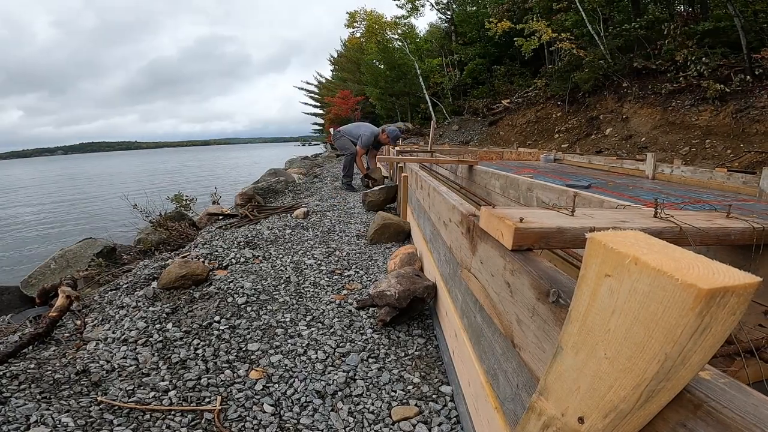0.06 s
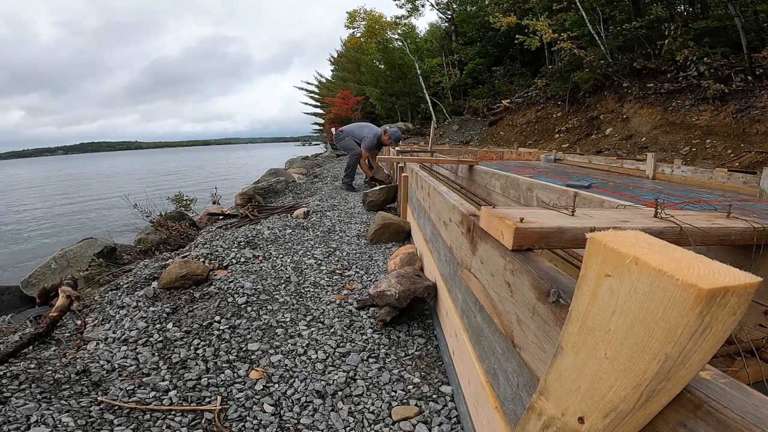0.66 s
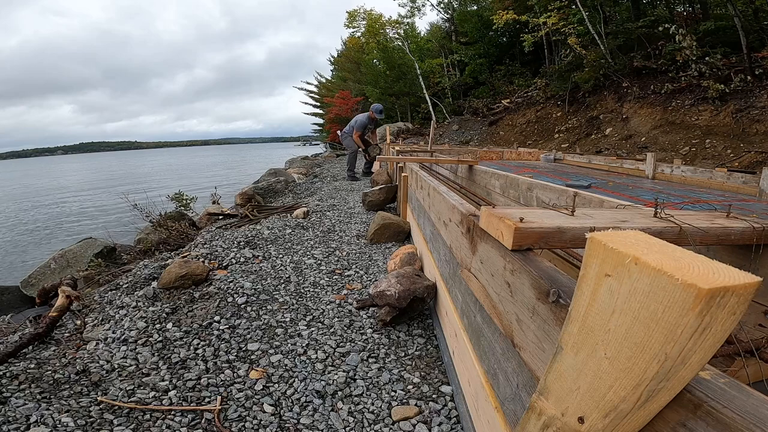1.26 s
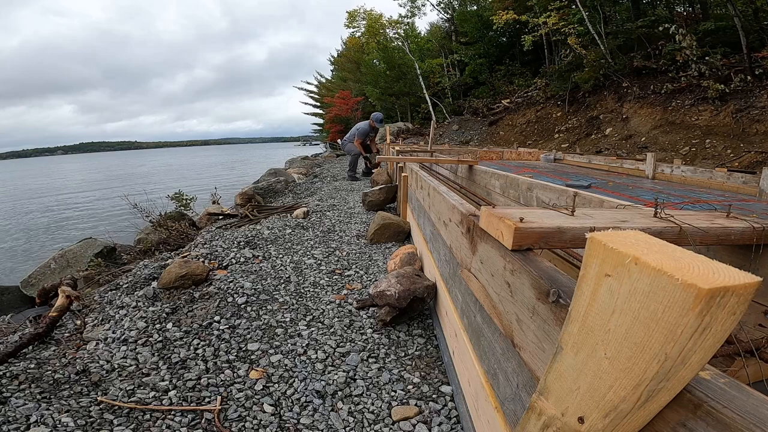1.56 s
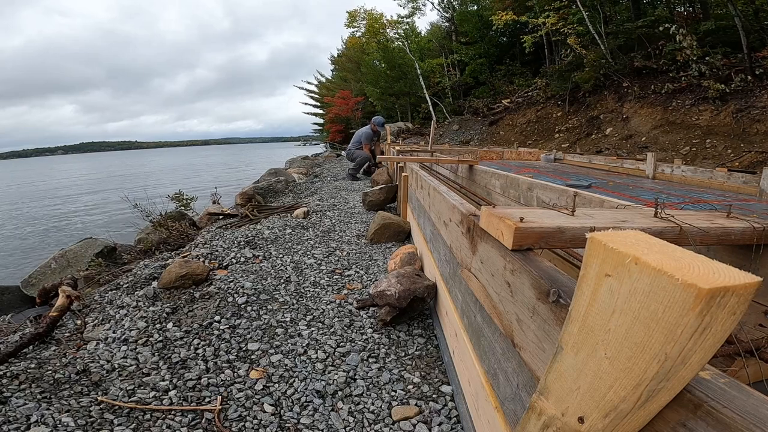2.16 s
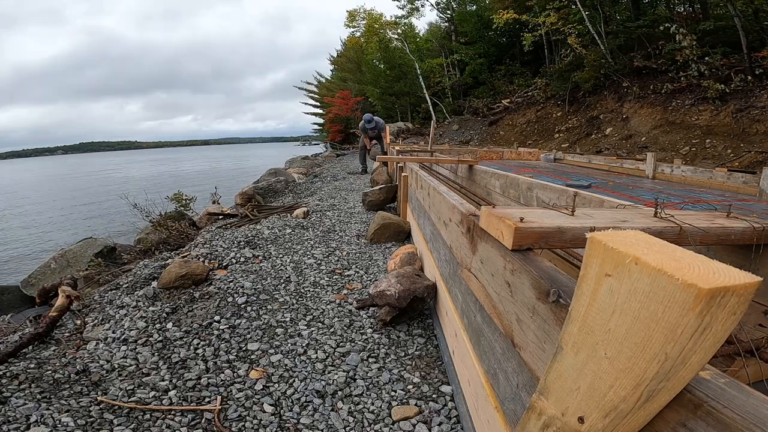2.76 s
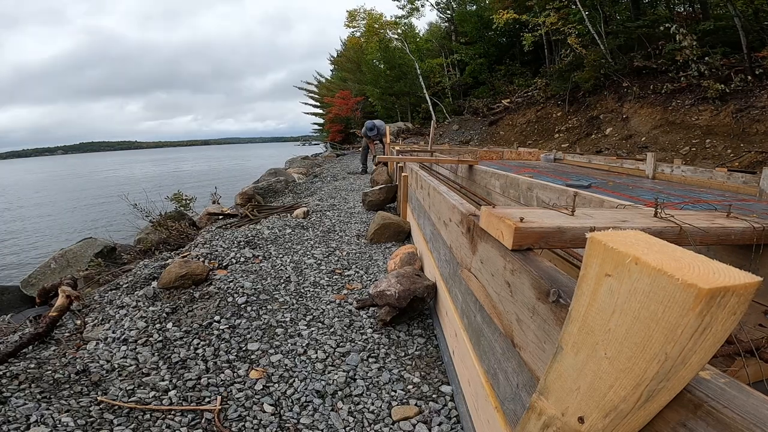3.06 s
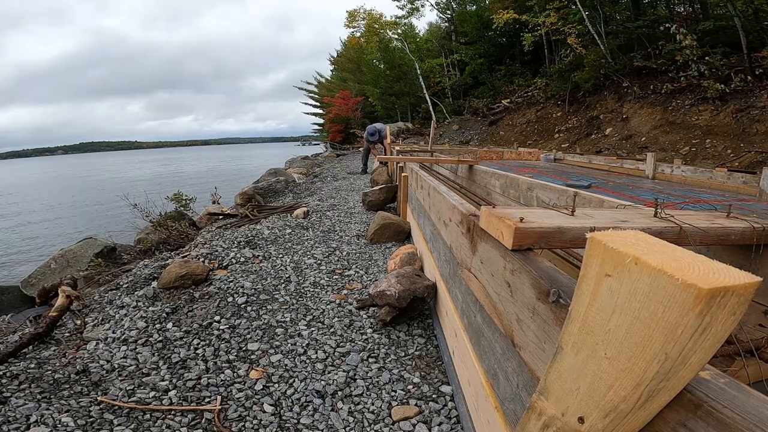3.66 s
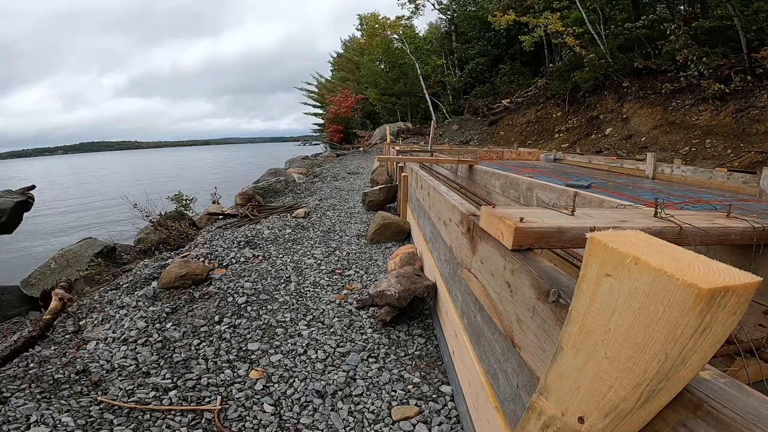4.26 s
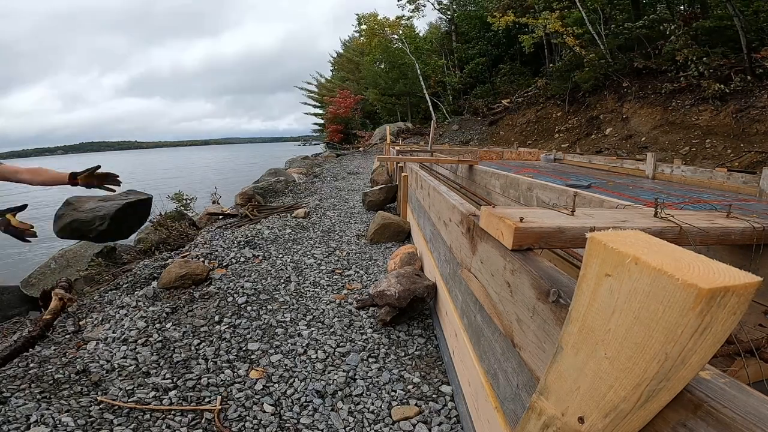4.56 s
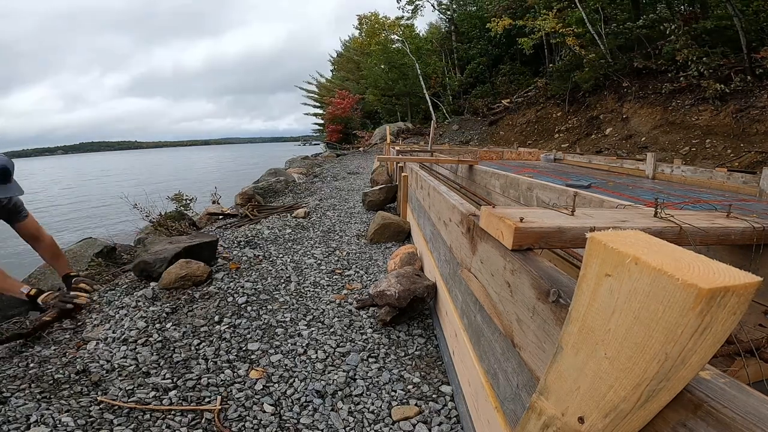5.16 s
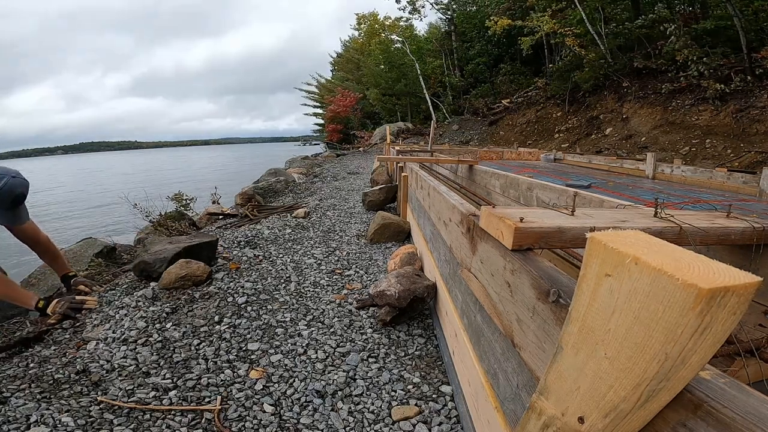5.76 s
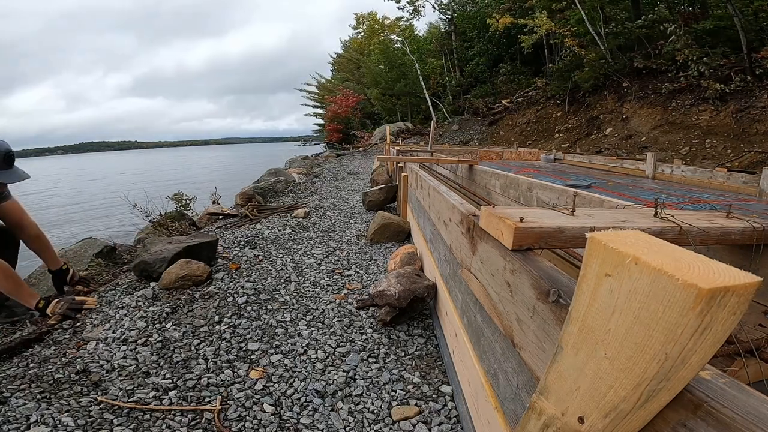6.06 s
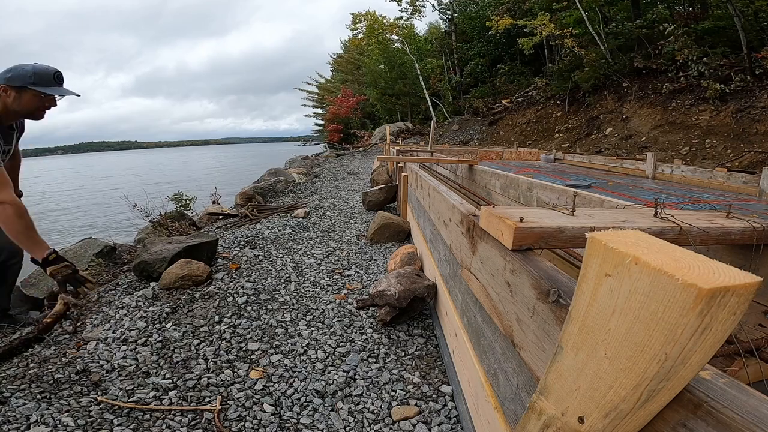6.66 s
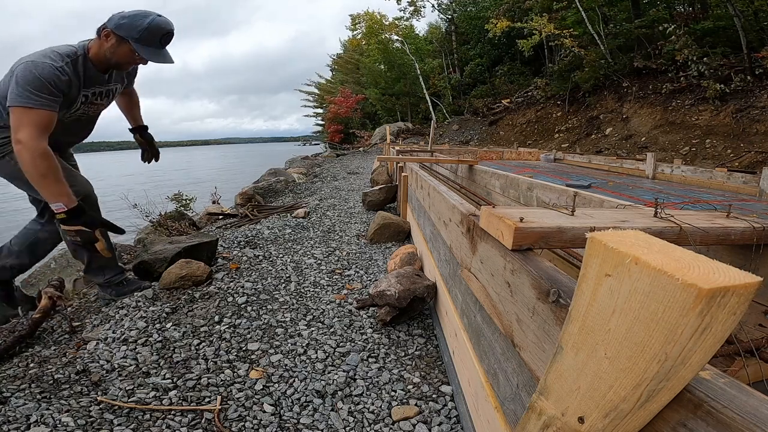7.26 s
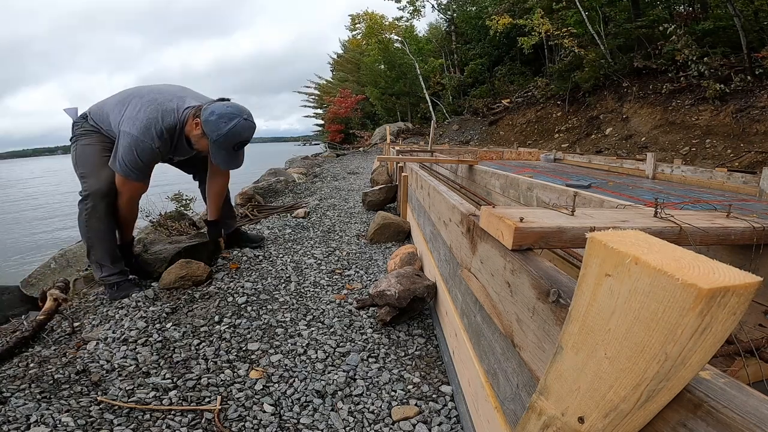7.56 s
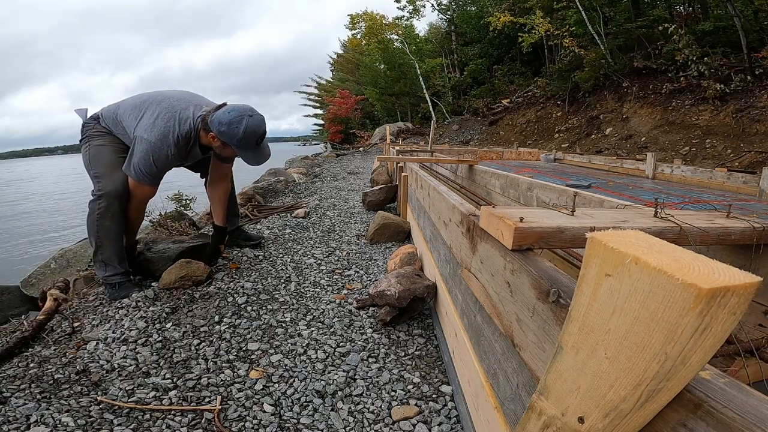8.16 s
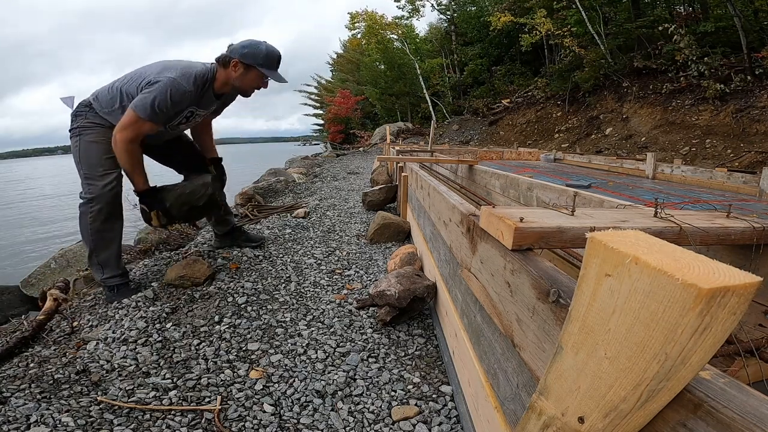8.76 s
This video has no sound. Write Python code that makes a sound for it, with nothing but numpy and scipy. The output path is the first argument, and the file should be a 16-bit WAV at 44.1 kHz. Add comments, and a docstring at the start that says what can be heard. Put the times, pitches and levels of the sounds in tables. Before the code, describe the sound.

Distant stones knock and thump against timber before a nearby rock crashes onto gravel, followed by boot crunches and faint ripples.

```python
"""On a gravel path beside a lake, rocks are shifted next to long timber formwork (boards for concrete).
Far rocks bump the boards, which ring and rumble. Then one is thrown down close by, pebbles spray,
a stone snaps against another, boots crunch and the rock is dragged up again. The gravel is countless
tiny collisions; single stones give short rings and cracks. Small waves hiss, gurgle and drip behind."""
import sys
import numpy as np
from scipy import signal
from scipy.fft import rfft, irfft
from scipy.io import wavfile
from scipy.ndimage import uniform_filter1d

SR = 44100
rng = np.random.default_rng(int(sys.argv[2]) if len(sys.argv) > 2 else 0)


def put_to_file(sound):
    """Save the sound as 16-bit audio at rate SR, in the file named by the first command-line argument."""
    columns = np.atleast_2d(sound).T  # one column per channel
    safe = np.clip(columns, -1, 1)
    whole_steps = np.round(safe * 32767)
    wavfile.write(sys.argv[1], SR, whole_steps.astype(np.int16))


N = 388962
TIME = np.arange(N) / SR
LULL_END_S = 3.745  # the background hiss jumps back up here
SILENT_DB = 60  # this far below its peak, a sound counts as gone

# In the tables, t60 is the time to fade by 60 dB, pan is left minus right,
# and tilt makes the sound above 400 Hz brighter (+) or duller (-).
# boots on gravel: (time [s], level [dB], rise [s], t60 [s])
STEPS = [(5.336, -42, 0.018, 0.18), (7.164, -47.5, 0.0056, 0.21), (7.213, -27.5, 0.018, 0.17),
         (7.38, -41.5, 0.0014, 0.25), (7.715, -48, 0.0089, 0.17), (7.799, -51, .012, 0.21),
         (7.98, -46.5, 0.0057, 0.24)]
# tone colour of shifting gravel: (frequency [Hz], level [dB])
SLIDE_COLOUR = [(90, -24), (194, 13), (280, 3.5), (460, 2.5), (600, -5), (800, -6), (970, 1), (1170, -4.5),
                (2540, -11), (3420, -7.5), (4000, -15.5), (4500, -12), (8600, -25.5), (12400, -37),
                (15000, -54)]


def amp(db):
    """Turn decibels into a gain."""
    return 10 ** (np.asarray(db) / 20)


def unit(x):
    """Scale to an average (rms) level of 1."""
    return x / np.sqrt(np.mean(x ** 2))


def decay(t, t60):
    """A fade that loses 60 dB every t60 seconds."""
    return np.exp(-np.log(1000) * t / t60)


def pan(db):
    """Left and right gains for a level difference."""
    return amp(np.array([[db], [-db]]) / 2)


def widen(mid, side, side_db):
    """Make left and right from a shared part (mid) and an opposed part (side)."""
    return mid + amp(side_db) * side * np.array([[1], [-1]])


def band(x, hz, width):
    """Keep one band of frequencies, at an average level of 1."""
    low = np.hypot(hz, width / 2) - width / 2
    bandpass = signal.butter(2, [low, low + width], "band", fs=SR, output="sos")
    return unit(signal.sosfilt(bandpass, x + 1e-18))


def add(out, s, sound):
    """Mix a sound in from time s on."""
    start = max(int(s * SR), 0)
    out[:, start:start + sound.shape[-1]] += sound[..., :N - start]


def read(points, hz):
    """Look up a table of (frequency [Hz], level [dB])."""
    known, db = np.transpose(points)
    return np.interp(np.log(hz), np.log(known), db)


def tint(colour, tilt, hz):
    """Gains for a tilted tone colour, with an average power of 1."""
    gain = amp(read(colour, hz) + tilt * np.log2(np.maximum(hz, 400)))
    return gain / np.sqrt(np.mean(gain ** 2, axis=-1, keepdims=True))


def shape_hiss(x, course, colour, flicker_db, size=512):
    """Colour a hiss, make it flicker and follow a course of (time [s], level [dB], tilt [dB/octave])."""
    hz, s, frames = signal.stft(x, SR, nperseg=size)
    times, levels, tilts = np.transpose(course)
    db, tilt = np.interp(s, times, levels)[:, None], np.interp(s, times, tilts)[:, None]
    flicker = uniform_filter1d(rng.standard_normal((len(s), len(hz))), size=7, axis=0)
    flicker = unit(uniform_filter1d(flicker, size=4, axis=1))  # nearby bands move together
    gain = amp(db + flicker_db * flicker) * tint(colour, tilt, np.maximum(hz, hz[1] / 2))
    return signal.istft(frames * gain.T, SR, nperseg=size)[1][:, :N]


def scatter(sound, paths):
    """The stones around send a sound back along many short paths."""
    return signal.fftconvolve(paths / np.linalg.norm(paths[0]), sound[None], axes=1)[:, :len(sound)]


def pings(table, modes, glide, attack_cycles, scatter_db, scatter_t60):
    """Short scattered rings; modes multiply each row's frequency, and glide bends it up or down."""
    out, t = np.zeros((2, N)), TIME[:SR // 5]
    for s, db, hz, t60 in table:
        pitch = hz * (1 + glide * np.minimum(t / t60, 1))
        phase = 2 * np.pi * np.cumsum(pitch) / SR
        ring = sum(amp(mode_db) * np.sin(ratio * phase) for ratio, mode_db in modes)
        attack = 1 - np.exp(-(t * hz / attack_cycles) ** 2)
        ring = ring * decay(t, t60) * attack
        ring = ring / np.abs(ring).max()
        paths = widen(*rng.standard_normal((2, len(t))), -17.0) * decay(t, scatter_t60)
        add(out, s, amp(db) * (ring + amp(scatter_db) * scatter(ring, paths)))
    return out


def lake(lull_start_s=2.465, edge_s=0.0048, sag_db=-50.5, lull_db=-57, lull_tilt=-3):
    """Ripples hiss along the shore. The background hiss sags, then drops suddenly into a duller lull and later
    jumps back up."""
    # the hiss before and after the lull: (time [s], level [dB], tilt [dB/octave])
    hiss_levels = [
        [(0.0, -45.5, -1.5), (0.58, -45.5, -1.5), (1.2, -49.5, -1), (2.05, -48.5, -1)],
        [(3.76, -50, -1), (5.05, -44.5, -2), (5.3, -48, -1.5), (7.7, -48, -0.5), (8.15, -50.5, -1.5)],
    ]
    # tone colour of the ripples: (frequency [Hz], level [dB])
    colour = [(18, -30), (30, 4.5), (87, -19.5), (113, -25), (147, 5.5), (185, -12.5), (296, -11.5),
              (374, -6.5), (415, -2), (448, -25), (552, -11), (790, -14), (1050, -7.5), (1400, -7.5),
              (2100, -7), (3200, -5.5), (5600, -12), (8690, -22.5), (15000, -40)]
    # their stereo width: (frequency [Hz], side minus mid [dB])
    width = [(60, -13.5), (400, -15.5), (1300, -20.5), (2400, -24), (4400, -8.5), (8000, -2.5)]
    mid, side = rng.standard_normal((2, N))
    padded = 10 * SR
    hz = np.fft.rfftfreq(padded, 1 / SR) + 1
    side = irfft(rfft(side, padded) * amp(read(width, hz)))[:N]
    before, after = hiss_levels
    lull = [(lull_start_s - edge_s, sag_db, 0), (lull_start_s, lull_db, lull_tilt),
            (LULL_END_S, lull_db, lull_tilt)]
    return shape_hiss(widen(mid, side, 0), [*before, *lull, *after], colour, flicker_db=1.69)


def gurgles(throb_db=4):
    """Water washes into a hollow of the shore and makes it resound unevenly."""
    # small waves: (middle time [s], level [dB], half length [s], frequency [Hz], band width [Hz])
    wavelets = [(0.86, -52.5, 0.27, 940, 230), (0.83, -49, 0.11, 430, 145)]
    out, t = np.zeros((2, N)), TIME[:SR]
    for s, db, half_length, hz, width in wavelets:
        throb = np.interp(t, np.linspace(0, 1, 35), rng.standard_normal(35))
        swell = np.exp(-((t - .5) / half_length) ** 2)
        hollow = band(rng.standard_normal(SR), hz, width)
        add(out, s - .5, amp(db + throb_db * throb) * swell * hollow)
    return out


def drips():
    """Drops fall among the shore rocks, each a tiny ring that rises in pitch."""
    # drops: (time [s], level [dB], base frequency [Hz], t60 [s])
    drops = [(1.4028, -49, 1310, 0.02), (3.2965, -44.5, 1000, 0.0067), (6.228, -42, 989, .012),
             (6.5366, -33, 1340, 0.0042), (6.992, -39, 1090, 0.0066), (7.06, -40, 1080, 0.0087)]
    return pings(drops, [(0.97, 0)], glide=0.096, attack_cycles=0.49, scatter_db=6.5, scatter_t60=0.044)


def falling_tones():
    """Two short, soft, low tones that fall in pitch."""
    # tones: (time [s], level [dB], base frequency [Hz], t60 [s])
    tones = [(4.568, -32.5, 270, 0.097), (6.22, -47, 337, 0.074)]
    return pings(tones, [(0.86, 0)], glide=-0.87, attack_cycles=4.2, scatter_db=-36, scatter_t60=0.18)


def pebbles(rate, spread_db):
    """Countless collisions from all sides: each pebble size ticks in its own band, small ones more often."""
    # stereo width of the ticks: (frequency [Hz], side minus mid [dB])
    width = [(200, -31), (1000, -24.5), (8000, -10), (12000, -0.5)]
    out = 0
    for hz in 100 * 2 ** (np.arange(15) / 2):  # half an octave apart
        count = int(rate * np.sqrt(hz / 1000) * N / SR)
        when, chance, place = np.random.default_rng(rng.integers(1 << 30)).random((count, 3)).T
        strength = amp(-spread_db * np.log(chance * .99 + .01)) * np.sign(place - .5)
        samples = (when * N).astype(int)
        mid = np.bincount(samples, strength, N)
        side = np.bincount(samples, strength * np.sqrt(2) * np.cos(4 * np.pi * place), N)
        ticks = widen(mid, side, read(width, hz))
        out = out + np.sqrt(hz) * band(ticks, hz, hz * (np.sqrt(2) - 1))
    return unit(out)


def slides(grains):
    """Dragged gravel swells to a peak and runs out, catching and giving way as it goes."""
    # scuffs and drags: (peak time [s], level [dB], swell [dB/s], fade [dB/s], tilt [dB/octave])
    drags = [(.8, -57, 500, 200, 13), (1.12, -51, 297, 211, 3), (6.3, -55, 17, 12, -0.5),
             (6.7, -59, 90, 73, 7), (7.4, -55, 148, 29, 5), (7.799, -52, 36.5, 68, 1),
             (8.4, -47.5, 63, 53, 3.5), (8.536, -42.5, 128, 230, 2.5), (8.624, -40, 210, 283, 3.5),
             (8.675, -41.5, 380, 153, 2.5), (8.775, -49, 136, 120, 5.5)]
    out = 0
    for s, db, swell, fade, tilt in drags:
        start, end = s - SILENT_DB / swell, s + SILENT_DB / fade
        course = [(start, db - SILENT_DB, tilt), (s, db, tilt), (end, db - SILENT_DB, tilt)]
        out = out + shape_hiss(grains, course, SLIDE_COLOUR, flicker_db=3)
    return out


def spray(grains, start_s=4.81, rise_s=0.026, hold_s=0.25):
    """Pebbles thrown up by the big rock rain down, while the bed beneath it grumbles."""
    # the bright pebbles and the dark bed, each: (level [dB], fade [dB/s], tilt [dB/octave])
    shower = (-48, 57, 1)
    grumble = (-53.5, 36, -4.5)
    # tone colour of the falling pebbles: (frequency [Hz], level [dB])
    shower_colour = [(1470, -35), (2500, -9), (2650, -4), (3500, -6), (8550, -4.5), (12400, -15.5),
                     (15000, -23)]
    out, full = 0, start_s + rise_s
    spent = full + hold_s
    for (db, fade, tilt), colour in ((shower, shower_colour), (grumble, SLIDE_COLOUR)):
        course = [(start_s, db - SILENT_DB, tilt), (full, db, tilt), (spent, db, tilt),
                  (spent + SILENT_DB / fade, db - SILENT_DB, tilt)]
        out = out + shape_hiss(grains, course, colour, flicker_db=1.8)
    return out


def grinds(grains, rise_s=0.0063, t60=0.049, width_share=0.47, slips_per_s=149, uneven_db=-1.5):
    """Grit catches and slips between two stones, sounding one broad band while the weight presses."""
    # stones grinding: (time [s], length [s], level [dB], main frequency [Hz])
    rubs = [(0.797, 0.024, -41.5, 960), (2.083, 0.013, -34, 1610), (2.733, 0.049, -50, 1130),
            (2.816, .04, -56, 1120), (3.591, 0.014, -43, 1270), (3.628, .04, -51.5, 735),
            (3.713, 0.0098, -41.5, 1150), (4.816, 0.02, -39, 1430), (4.817, 0.017, -29.5, 2670),
            (7.215, 0.018, -32, 454), (7.216, 0.027, -30, 910), (7.23, .025, -37, 4360),
            (8.587, .05, -52, 990), (8.666, 0.016, -54, 980)]
    out, t = np.zeros((2, N)), TIME[:SR // 4]
    for (s, length, db, hz), slips in zip(rubs, rng.standard_normal((len(rubs), 64))):
        grit = np.roll(grains, -int(s * SR), axis=1)[:, :len(t)]
        load = np.minimum(t / rise_s, 1) * decay(np.maximum(t - length, 0), t60)
        judder = np.interp(t * slips_per_s, np.arange(len(slips)), slips)
        add(out, s, amp(db + uneven_db * judder) * load * band(grit, hz, hz * width_share))
    return out


def contacts():
    """List the boots, stone edges and landing rocks that press into the gravel."""
    # a stone's hard edge bites: (time [s], level [dB], t60 [s], tilt [dB/octave], pan [dB])
    bites = [(3.629, -40, 0.3, -8.5, -2), (3.656, -42.5, 0.075, -9, 0), (4.805, -25.5, 0.084, 1, 11),
             (6.405, -31, 0.029, -4, 3), (6.42, -25, 0.021, 0.5, 8)]
    # a rock lands and settles: (time [s], level [dB], settling level [dB], tilt [dB/octave], pan [dB])
    landings = [(2.079, -32, -36.5, -4, -1.5), (2.73, -47, -49.5, -3.5, 0), (3.485, -36.5, -52, -3.5, 0),
                (3.581, -30.5, -50, -13, -1), (4.811, -21, -38.5, -0.5, -2)]
    step_tilt, step_pan_db = -4, 1
    bite_rise_s, land_rise_s, land_t60 = 0.0026, 0.011, 0.081
    settle_after_s, settle_rise_s, settle_t60, settle_tilt = 0.014, 0.0086, 0.47, -4.5
    rows = [(s, db, rise, t60, step_tilt, step_pan_db) for s, db, rise, t60 in STEPS]
    rows += [(s, db, bite_rise_s, t60, tilt, pan_db) for s, db, t60, tilt, pan_db in bites]
    for s, db, settle_db, tilt, pan_db in landings:
        rows.append((s, db, land_rise_s, land_t60, tilt, pan_db))
        rows.append((s + settle_after_s, settle_db, settle_rise_s, settle_t60, tilt + settle_tilt, pan_db))
    return rows


def crunches(grains, bass_hz=1500, bass_linger=1.3):
    """A weight sinks into the gravel: collisions flare up and die away, the big slow stones last."""
    # tone colour of a crunch: (frequency [Hz], level [dB])
    colour = [(220, -22), (380, -4.5), (622, -9.5), (795, -2.5), (1190, -5.5), (1430, -1.5), (2000, 0),
              (2810, 1), (3370, 0.5), (8230, 1.5), (15000, -17)]
    out = np.zeros((2, N))
    for s, db, rise, t60, tilt, pan_db in contacts():
        burst = grains[:, int(s * SR):][:, :SR // 2]
        t = TIME[:burst.shape[1]]
        hz = np.fft.rfftfreq(len(t), 1 / SR) + 1
        spectrum = rfft(burst) * tint(colour, tilt, hz)
        big_stones = 1 / (1 + (hz / bass_hz) ** 2)
        for share, life in ((big_stones, t60 * bass_linger), (1 - big_stones, t60)):
            shape = np.minimum(t / rise, 1) * decay(np.maximum(t - rise, 0), life)
            add(out, s, amp(db) * pan(pan_db) * shape * irfft(spectrum * share, len(t)))
    return out


def heels(heel_db=-1, low_hz=101, high_hz=500):
    """Each step sends one dull blow through the ground to the boards."""
    return [(s, db + heel_db, low_hz, high_hz, TIME[-1], 0) for s, db, _, _ in STEPS]


def thuds(gap_s=.04, gap_spread=0.1218):
    """Runs of ever duller low thuds; the late runs are soft, deep puffs of rumble."""
    # runs: (time [s], level [dB], length [s], fade [dB/s], highest frequency [Hz], pan [dB])
    runs = [(0.033, -24, 0.064, 54.5, 82, 9), (0.101, -18, 0.054, 60, 140, 5),
            (0.162, -17.5, 0.26, 70, 182, 4.5), (0.477, -33.5, 0.099, 88, 100, 5),
            (0.605, -15.5, 0.12, 118, 233, -2.5), (2.104, -10, 0.21, 136, 410, -3.5),
            (2.15, -14.5, 0.17, 123, 114, -5.5), (2.306, -32, .155, 22.5, 190, -2.5),
            (2.724, -37.5, 0.14, 50, 181, 1), (2.771, -37, 0.056, 202, 170, 1),
            (3.505, -29, 0.019, 450, 230, 0.5), (3.589, -9, .155, 60, 330, -4),
            (3.654, -21, .05, 200, 620, -4), (4.822, -17.5, 0.028, 240, 190, 0),
            (4.853, -29.5, 0.093, 60, 161, -4), (6.242, -30.5, 0.13, 202, 52.7, -10),
            (6.401, -38.5, .06, 150, 90.8, 0), (7.639, -47, 0.071, 60, 69, -7),
            (7.782, -43, 0.11, 110, 100, -8), (8.08, -45.5, 0.18, -8, 64.5, -2)]
    dull_share, dull_s = 0.4, 0.095  # the top frequency sinks towards this share
    bass_hz, thin_share, thin_s = 22.6, 0.21, 0.12  # the first thuds of a run have less bass
    rows = []
    for (s, db, length, fade, hz, pan_db), chance in zip(runs, rng.standard_normal((len(runs), 16))):
        gaps = gap_s * np.exp(gap_spread * chance)
        ages = np.cumsum(gaps) - gaps
        for age in ages[ages < length]:
            high_hz = hz * (dull_share + (1 - dull_share) * np.exp(-age / dull_s))
            low_hz = min(bass_hz + thin_share * hz * np.exp(-age / thin_s), high_hz / 2)
            rows.append((s + age, db - fade * age, low_hz, high_hz, s + length, pan_db))
    return rows


def timber(t, twist=0.31, uneven_db=2, detune=.015):
    """The boards bend and ring, a little differently each time as each blow lands on another spot."""
    # the boards' natural tones: (frequency [Hz], level [dB], t60 [s])
    modes = [(57.6, 2.5, 0.18), (80, 3, 0.098), (125.6, -1, 0.24), (182.9, 4, 0.16), (219.5, -5, 0.21),
             (315, -10.5, 0.12), (370.6, -9, 0.41), (405.6, -10, 0.35), (533.5, 3, 0.096),
             (658.5, -2.5, 0.074), (910, -33, 0.087)]
    lead = np.array([[1], [-1]]) * twist / 2  # the mount twists, so left and right move out of step
    chances, ring = rng.standard_normal((len(modes), 2)), 0
    for k, ((hz, db, t60), (strength, shift)) in enumerate(zip(modes, chances)):
        phase = 2 * np.pi * hz * (1 + detune * shift) * t + lead * (-1) ** k
        ring = ring + amp(db + uneven_db * strength) * np.sin(phase) * decay(t, t60)
    return ring / np.linalg.norm(amp([db for _, db, _ in modes]))


def boards(rattle_db=-3.5, rattle_t60=0.21, rattle_hz=170, rise_s=0.0042, stop_s=0.0023):
    """Each thud is made of ringing timber and rattling loose joints, kept to its own band of tones."""
    out, t = np.zeros((2, N)), TIME[:SR // 4]
    for s, db, low_hz, high_hz, stop, pan_db in thuds() + heels():
        noise = widen(*rng.standard_normal((2, len(t))), -7.5)
        rattle = unit(signal.lfilter(*signal.butter(1, rattle_hz, fs=SR), noise))
        thud = timber(t) + amp(rattle_db) * rattle * decay(t, rattle_t60)
        thud = thud * np.minimum(t / rise_s, 1)  # a soft start
        thud = signal.sosfilt(signal.butter(2, [low_hz, high_hz], "band", fs=SR, output="sos"), thud)
        cutoff = np.clip((stop - s - t) / stop_s, 0, 1)
        add(out, s, amp(db) * pan(pan_db) * thud / np.abs(thud.mean(0)).max() * cutoff)
    return out


def clicks():
    """Single stones strike each other and ring briefly."""
    # strikes: (time [s], level [dB], main frequency [Hz], t60 [s])
    strikes = [(.973, -30, 8500, .011), (1.1374, -36.5, 1160, 0.027), (1.8069, -34, 1250, 0.0093),
               (2.0937, -23.5, 1370, 0.014), (2.111, -15.5, 1902, 0.018), (3.4985, -23, 1510, 0.0037),
               (4.8068, -17, 7700, 0.005), (4.8192, -10, 4500, 0.0039), (5.1169, -29.5, 3260, 0.015),
               (7.164, -42, 402, 0.025), (8.362, -30, 277, 0.021), (8.379, -33, 282, .015),
               (8.665, -33, 320, 0.025)]
    # a stone's natural tones: (multiple of the main frequency, level [dB])
    modes = [(1, 17), (1.39, 12.5), (2.08, 1.5)]
    return pings(strikes, modes, glide=0, attack_cycles=0.6, scatter_db=-4.5, scatter_t60=0.015)


def snaps(half_cycles=0.87, echo_db=-11, echo_after_s=0.0012, echo_t60=0.01):
    """Dry cracks too brief to ring: stones, and one sharp tick as the lull ends. Each has a tiny echo."""
    # cracks: (time [s], level [dB], frequency [Hz])
    cracks = [(2.0925, -20, 3576), (2.1035, -21, 3120), (2.1122, -23, 2800), (3.4992, -25, 2380),
              (3.631, -34, 4197), (3.662, -36, 3640), (3.7449, -33, 7940), (4.9915, -24, 8300),
              (5.0335, -25, 7400), (5.055, -26, 6400), (5.0655, -18.5, 7550), (5.1172, -30, 4530),
              (5.2375, -29.5, 6500), (6.4223, -6, 5250)]
    out, t = np.zeros((2, N)), TIME[:SR // 20]
    for s, db, hz in cracks:
        lead = 2 * half_cycles / hz
        cycles = hz * (t - lead)
        crack = np.sin(2 * np.pi * cycles) * np.exp(-(cycles / half_cycles) ** 2)
        paths = widen(*rng.standard_normal((2, len(t))), -8) * (t > echo_after_s) * decay(t, echo_t60)
        add(out, s - lead, amp(db) * (crack + amp(echo_db) * scatter(crack, paths)))
    return out


def stereo_image(x, lag_samples=2, wide_above_hz=11700):
    """The sound starts wide and leaning right, jumps to the middle as the lull ends, and slowly reopens."""
    # stereo width: (time [s], side gain [dB])
    width = [(3.73, 5.5), (3.76, -34), (4.9, -49), (5.3, -14), (7.1, 4)]
    late_left = np.pad(x[0], (lag_samples, 0))[:N]
    left, right = np.where(TIME < LULL_END_S, late_left, x[0]), x[1]
    mid, side = (left + right) / 2, (left - right) / 2
    top = signal.sosfiltfilt(signal.butter(4, wide_above_hz, "high", fs=SR, output="sos"), side)
    side_gain = amp(np.interp(TIME, *np.transpose(width)))
    return widen(mid, top + (side - top) * side_gain, 0)  # the highest treble stays wide


def scene():
    """Gravel, stones, timber and water in the open air."""
    grains = pebbles(rate=1100, spread_db=2.5)
    gravel = crunches(grains) + pan(1.0) * slides(grains) + spray(grains) + grinds(grains)
    return gravel + clicks() + drips() + falling_tones() + boards() + snaps() + lake() + gurgles()


def record(dry):
    """The recorder shapes the stereo image and cuts the lowest rumble and the highest treble."""
    low_cut = signal.butter(2, 20, "high", fs=SR, output="sos")
    high_cut = signal.ellip(8, .2, 70, 15300, fs=SR, output="sos")
    return signal.sosfilt(high_cut, signal.sosfilt(low_cut, stereo_image(dry)))


dry = scene()
out = record(dry)
put_to_file(out)
```